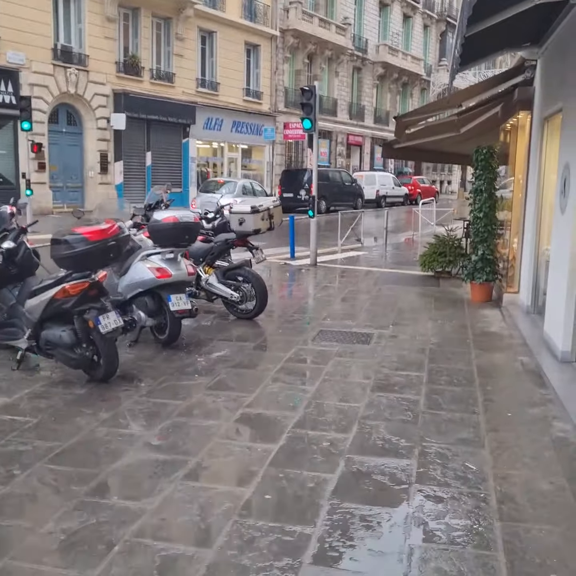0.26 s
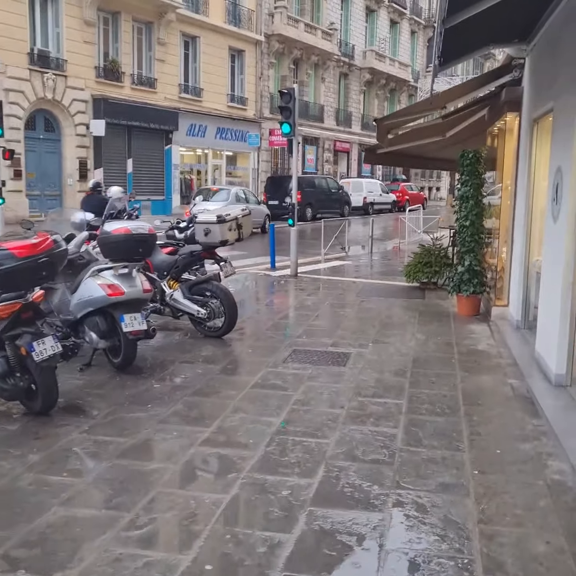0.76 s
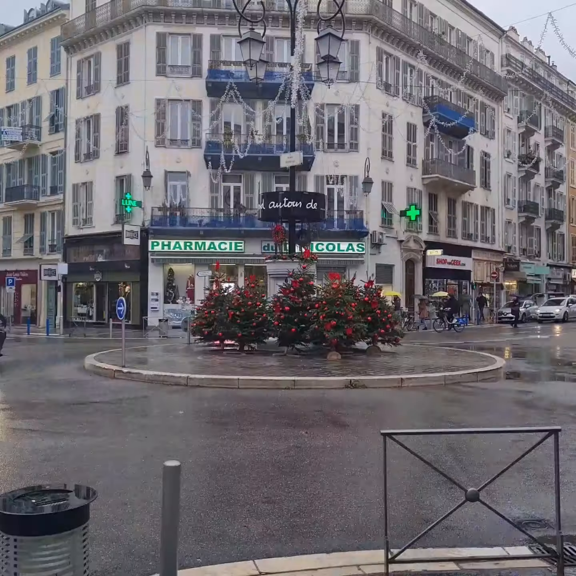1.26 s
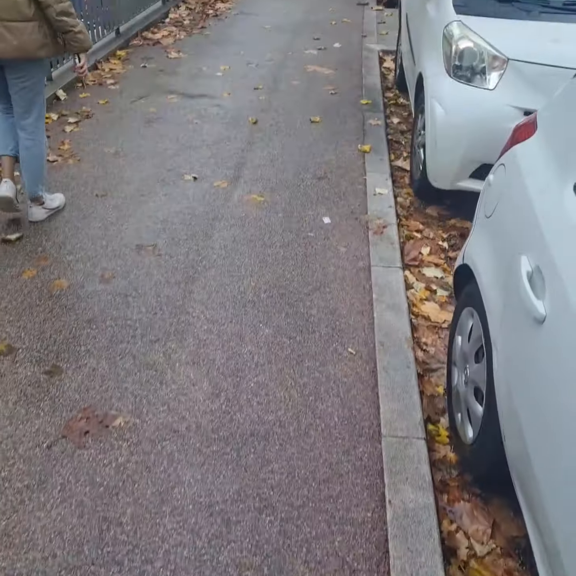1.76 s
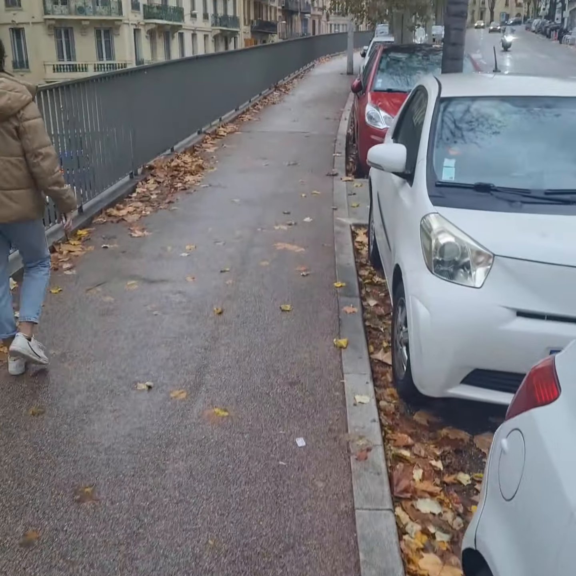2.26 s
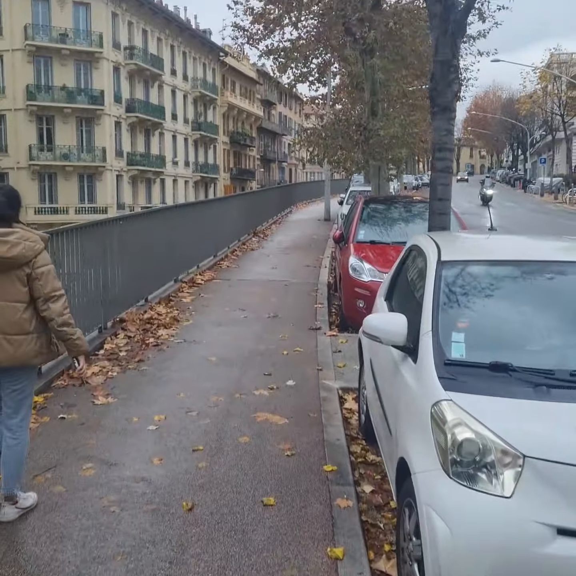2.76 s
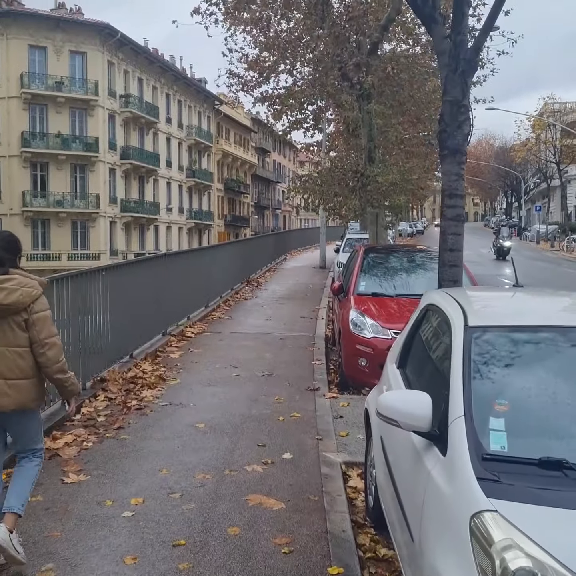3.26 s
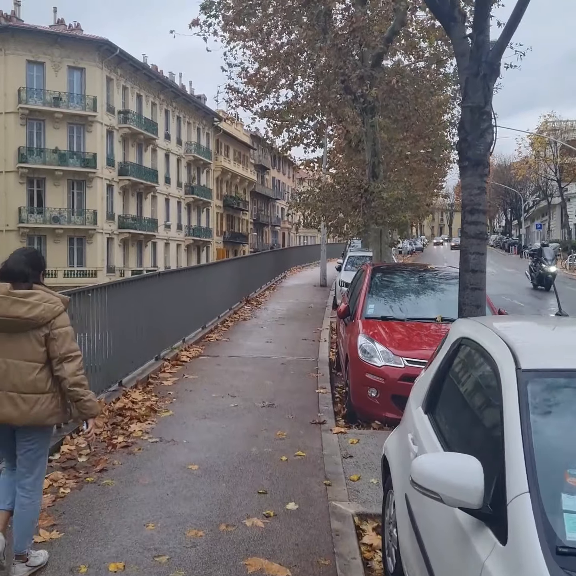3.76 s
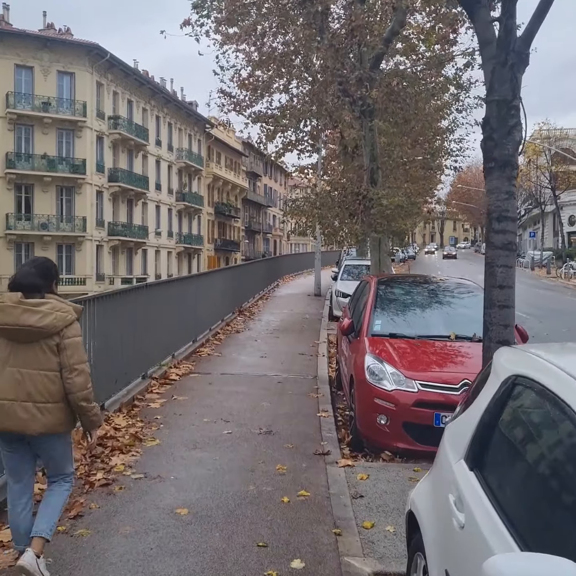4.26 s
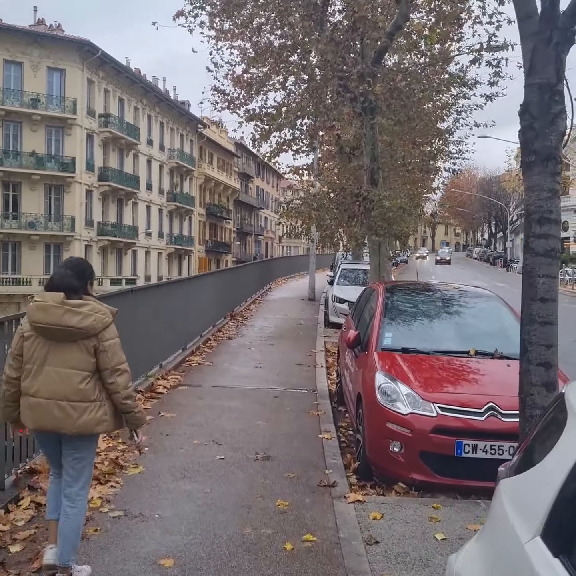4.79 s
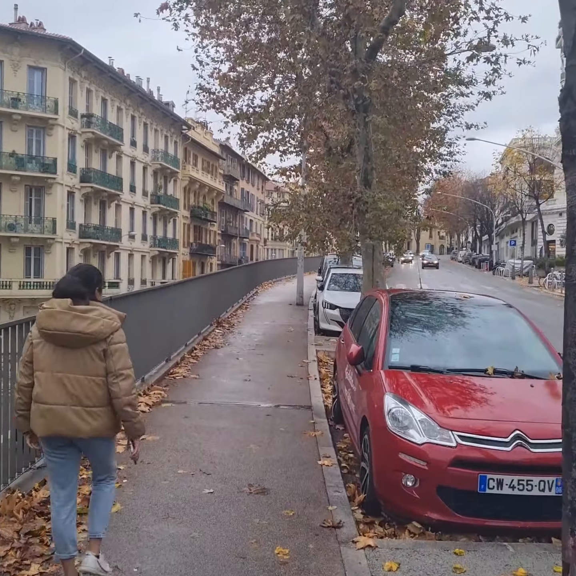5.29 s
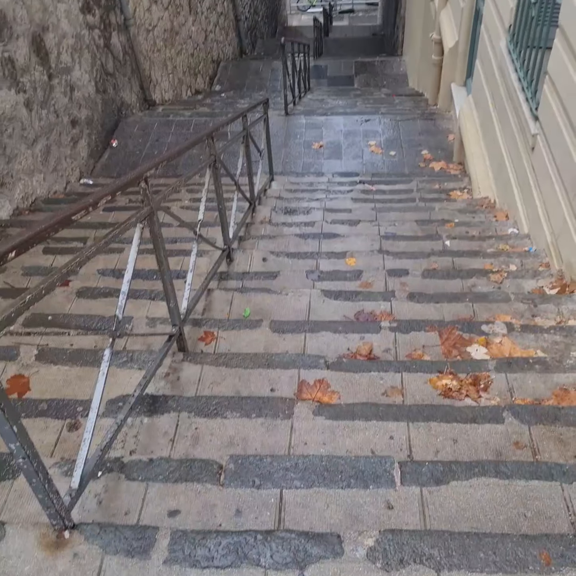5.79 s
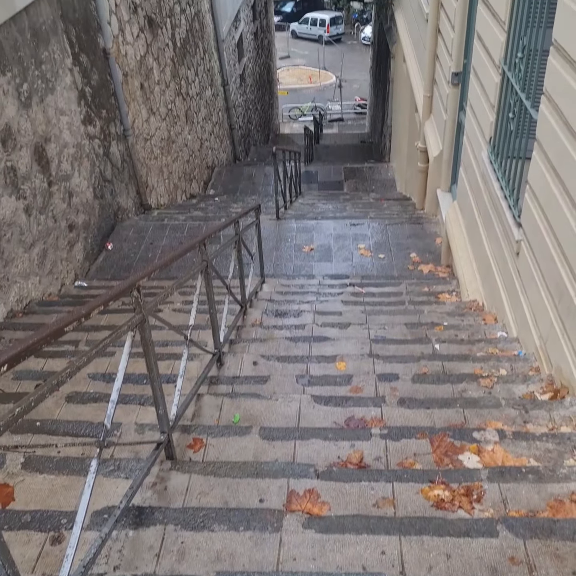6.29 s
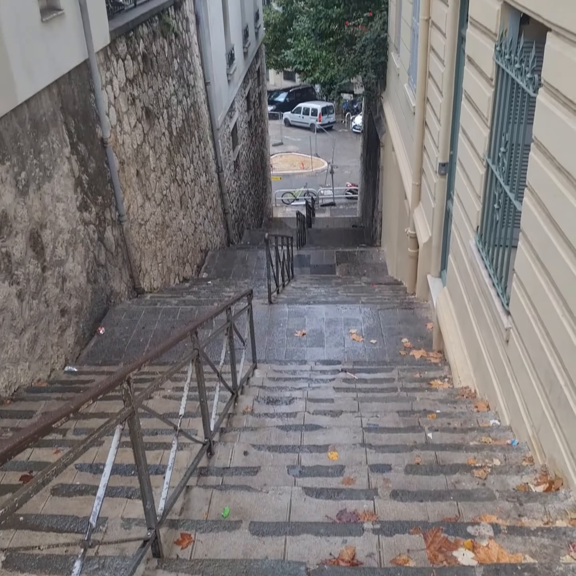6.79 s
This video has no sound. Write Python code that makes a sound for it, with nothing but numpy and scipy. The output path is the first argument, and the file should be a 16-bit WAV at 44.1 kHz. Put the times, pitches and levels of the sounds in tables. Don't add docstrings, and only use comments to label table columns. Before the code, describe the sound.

Wet tyre hiss and faint drops run through three abruptly cut street scenes. First comes a close, steady idling engine whose tones waver in echoes. Next, soft footsteps and passing motors on an avenue, with a high scratchy brake squeal, build to a near car throwing spray. Last, muffled town traffic throbs and hums up a stone stairway. Wide outdoor stereo, near drops ticking by the microphone.

```python
import sys
import numpy as np
from scipy import signal
from scipy.fft import rfft, irfft, next_fast_len
from scipy.io import wavfile
from scipy.ndimage import uniform_filter1d, map_coordinates

SR = 44100
rng = np.random.default_rng(int(sys.argv[2]) if len(sys.argv) > 2 else 0)


def convert_level_to_amplitude(level_db):
    exponent = np.asarray(level_db, float) / 20
    return 10 ** exponent


def generate_wav(sig):
    pcm = np.round(np.clip(np.atleast_2d(sig).T, -1, 1) * 32767).astype(np.int16)
    wavfile.write(sys.argv[1], SR, pcm)


N = 310464

# (start [s], cut [s])
TAKES = [
    (0, 1.4003),
    (1.4967, 5.7097),
    (5.7843, 7.05),
]


def unit(x):
    return x / np.sqrt(np.mean(x ** 2) + 1e-20)


def along(points, hz):
    f, v = np.transpose(points)
    return np.interp(np.log(hz + 1), np.log(f + 1), v)


def curves(rows):
    s, *cols = np.transpose(rows)
    return [np.interp(np.arange(N) / SR, s, c) for c in cols]


def sounding(rows, fade=0.045):
    t = np.arange(N) / SR
    return np.clip(np.minimum(t - rows[0][0], rows[-1][0] - t) / fade + 1, 0, 1)


def wobble(rate):
    knots = rng.standard_normal(int(N * rate / SR) + 4)
    return map_coordinates(knots, [np.arange(N) * rate / SR])


def panned(x, db):
    return np.array([x * convert_level_to_amplitude(db / 2), x * convert_level_to_amplitude(-db / 2)])


def swells(rows, floor_db=-120, rise=1):
    t = np.arange(0, N + 64, 64) / SR
    power = convert_level_to_amplitude(floor_db) ** 2
    for s, db, half in rows:
        width = half * np.where(t < s, rise, 1)
        power = power + convert_level_to_amplitude(db) ** 2 * np.exp(-((t - s) / width) ** 2)
    return np.interp(np.arange(N) / SR, t, np.sqrt(power))


def patchy(count, depth_db):
    z = signal.stft(rng.standard_normal((2, count + 512)), nperseg=512)[2]
    field = uniform_filter1d(rng.standard_normal(z.shape[1:]), size=8, axis=0)
    field = uniform_filter1d(field, size=10, axis=1)
    return signal.istft(z * convert_level_to_amplitude(depth_db * unit(field)), nperseg=512)[1][:, :count]


def tone(hz, rough, rate):
    rough = np.clip(rough, 0, 1)
    carrier = np.exp(2j * np.pi * (np.cumsum(hz) / SR + rng.random()))
    wander = wobble(rate) + 1j * wobble(rate)
    return unit(np.real(carrier * (np.sqrt(1 - rough) + np.sqrt(rough / 2) * wander)))


def hum(rows, rough, rate=14):
    hz, *_ = curves(rows)
    gain = swells([(s, db, half) for s, _, db, half in rows])
    return panned(gain * tone(hz, rough, rate), -1.5 + 1.5 * wobble(3.5))


def squeal(rows, rough, rate, pan_db, flutter_db=2):
    hz, db = curves(rows)
    direct = tone(hz, rough, rate)
    ports = [.75 * direct + .85 * tone(hz, 1, rate) + .4 * tone(hz, 1, 5 * rate) for _ in range(2)]
    gain = convert_level_to_amplitude(db + flutter_db * wobble(70)) * sounding(rows)
    return gain * ports * convert_level_to_amplitude([[pan_db / 2], [-pan_db / 2]])


def street():
    handover_hz = [85, 200, 1000, 3500, 8000, 13000]
    # (frequency [Hz], level [dB])
    road_colours = [
        [(13, -30), (22, 16), (129, -1.5), (204, -4), (266, 9), (352, -0.5), (529, 1.5), (1020, -31),
         (1500, -25), (1950, -45), (3300, -120)],
        [(13, -41), (22, 3), (49, 20), (86, 6), (193, -9.5), (270, -7.5), (413, -12), (948, -16), (1500, -18),
         (1950, -56), (3300, -120)],
        [(13, -43), (22, 6), (81, 6), (112, 2), (151, -10.5), (231, -8.5), (529, -19), (948, -17), (1500, -47),
         (1950, -54), (3300, -120)],
    ]
    # (frequency [Hz], level [dB])
    tyre_colours = [
        [(410, -15), (700, 6.5), (897, 2.5), (995, -2.5), (1340, -4), (2320, -3.5), (3090, -12), (3860, -16),
         (4700, -16.5), (7610, -25), (8900, -30.5), (12700, -21.5), (15800, -24.5)],
        [(410, -34), (700, -1.5), (1630, -1.5), (1990, 0.5), (2580, -6.5), (3350, -9), (3760, -11.5),
         (4880, -11.5), (6590, -18), (7710, -19), (9010, -25), (12000, -15.5), (15800, -16.5)],
        [(410, -31), (700, -0.5), (920, 0), (1260, -1.5), (1380, -0.5), (1910, -1.5), (2180, -6), (3620, -14),
         (4400, -14), (6680, -19), (8670, -29), (12200, -24.5), (15800, -23.5)],
    ]
    # (frequency [Hz], left-right likeness [0 to 1])
    alike = [
        [(60, .75), (130, .85), (290, .6), (640, .4), (1410, .5), (2600, .42), (5500, .11), (15000, .05)],
        [(60, .81), (130, .9), (290, .88), (640, .74), (1410, .4), (2300, .33), (4500, .05), (15000, .03)],
        [(60, .84), (130, .88), (290, .85), (640, .57), (1410, .21), (2600, .04), (6820, .04), (15000, .05)],
    ]
    # (frequency [Hz], left minus right [dB])
    lean = [
        [(60, -3), (200, -4), (700, 0), (1290, -3), (2300, -5.8), (4400, -3.5), (6300, -2), (7600, 6),
         (10000, 5.5), (12000, 0), (15000, -1)],
        [(60, -2.5), (200, -.5), (700, -.5), (1290, -3), (2000, -5.2), (2700, -2.2), (6300, -1), (7600, 6),
         (10000, 4.5), (12000, -1), (15000, -5)],
        [(60, -2), (200, 0), (700, -1), (1290, -4.5), (2000, -4.2), (2700, -2), (6300, -3.8), (7600, 2.5),
         (10000, 4), (12000, 1), (15000, -2)],
    ]
    # (frequency [Hz], phase [rad])
    ahead = [(10, 0), (1700, -.2), (2300, .9), (3200, 2)]
    # (time [s], tread hiss [dB])
    traffic = [
        [(0, -35.5), (.14, -36), (.3, -36), (.75, -38.5), (1.21, -40), (1.39, -36)],
        [(1.51, -46.5), (2.3, -44), (3.3, -41.5), (4.2, -41), (4.6, -39.5), (5.1, -38), (5.5, -36),
         (5.7, -32.5)],
        [(5.8, -41.5), (6.17, -42), (6.4, -40.5), (7.03, -41.5)],
    ]
    usual_db = -40
    # (throb, drone, road roar, tread hiss, water hiss, spray, mist [dB])
    layers_db = [
        (-57.5, -44.5, -38.5, -38.5, -50.5, -69.5, -67),
        (-57, -41.5, -38.5, -39, -48.5, -65.5, -69),
        (-38, -46, -34.5, -39, -45, -60, -68),
    ]
    grows_by = (.3, 0.58, 0.63, 0.82, 1.35, 1.3, 1.2)
    # (time [s], level [dB], half length [s])
    throbs = [(.6, -38.5, 0.26), (1.0, -35, 0.066), (1.36, -37, 0.13), (1.72, -40.5, .1), (2.1, -36, 0.077),
              (2.45, -39, 0.22), (2.9, -46, 0.15), (3.2, -36, 0.14), (3.75, -34, 0.16), (4.22, -37, 0.1),
              (4.4, -38, 0.069), (4.7, -35.5, 0.21), (5.27, -32, 0.12), (5.69, -34, 0.043),
              (5.89, -39, 0.039), (6.1, -42, .07), (6.45, -29, 0.29), (6.9, -37, .1)]
    # (time [s], spray level [dB], half length [s], mist over spray [dB])
    splashes = [(.0, -56.5, 0.053, -1.5), (0.33, -56.5, 0.24, -1), (0.935, -61, .14, -2),
                (1.303, -59.5, 0.24, -14), (1.498, -60.5, 0.014, 1), (1.689, -61, .012, -4),
                (1.8, -63.5, 0.047, 5), (1.918, -62.5, 0.072, 8.5), (2.092, -63, 0.046, 3),
                (2.2, -65, 0.04, 3), (2.29, -64, .015, 6), (2.36, -68, .02, 5), (2.7, -67, 0.027, -1),
                (2.985, -69.5, .05, 3), (3.217, -68, 0.11, 7), (3.652, -68.5, .25, -4),
                (4.068, -69.5, .1, -8), (4.504, -69, 0.1, -5), (4.62, -64, .04, 0), (4.81, -63, .02, 3),
                (4.853, -61.5, 0.099, -2.5), (5.506, -55, 0.24, -13), (5.926, -57.5, 0.25, -5),
                (6.095, -59, 0.045, -1), (6.54, -61, .28, -3), (7.018, -59.5, 0.055, -3)]

    out = np.zeros((2, N))
    spray = swells([(s, db, half) for s, db, half, _ in splashes], rise=0.89)
    mist = swells([(s, db + bright_db, half) for s, db, half, bright_db in splashes], rise=0.89)
    spray = spray * convert_level_to_amplitude(1.6 * wobble(18))
    mist = mist * convert_level_to_amplitude(1.6 * wobble(18))
    none = np.zeros(N)
    splash_body = convert_level_to_amplitude(9) * spray
    extra = [swells(throbs), none, none, none, splash_body, spray, mist]
    for k, (start, end) in enumerate(TAKES):
        a, b = max(round(start * SR) - 400, 0), min(round(end * SR) + 400, N)
        m = next_fast_len(b - a)
        hz = np.fft.rfftfreq(m, 1 / SR)
        turn = np.arccos(np.clip(along(alike[k], hz), -1, 1)) / 2
        mid, side = rfft(patchy(m, depth_db=0.56)) * [np.cos(turn), np.sin(turn)]
        pair = np.array([mid + side, mid - side]) * panned(np.ones_like(hz), along(lean[k], hz))
        pair *= np.exp([.5j * along(ahead, hz), -.5j * along(ahead, hz)])
        pair /= 1 + (37 / (hz + 1)) ** 6
        above = [1 / (1 + (edge / (hz + 1)) ** 8) for edge in handover_hz]
        shares = -np.diff([np.ones_like(hz), *above, np.zeros_like(hz)], axis=0)
        colours = [road_colours[k]] * 3 + [tyre_colours[k]] * 4
        near_db = curves(traffic[k])[0][a:b] - usual_db
        for share, colour, db, grows, more in zip(shares, colours, layers_db[k], grows_by, extra):
            layer = irfft(pair * convert_level_to_amplitude(along(colour, hz)) * np.sqrt(np.abs(share)), m)[:, :b - a]
            gain = np.hypot(convert_level_to_amplitude(db + grows * near_db), more[a:b])
            out[:, a:b] += gain * layer / np.std(layer.mean(axis=0))
    return out


def scooter():
    # (time [s], firing rate [Hz])
    idle = [(0.0, 66.9), (0.406, 67), (0.538, 67.13), (1.01, 66.07), (1.39, 66.43)]
    # (order of the firing rate, level [dB])
    exhaust = [(1, -5), (2, -2), (3, -13), (4, 0), (5, -14.5), (6, -14), (7, -10), (8, -11), (9, -15),
               (10, -21), (11, -19.5), (12, -20), (13, -19), (14, -19.5), (15, -24), (16, -25.5), (17, -29),
               (18, -23)]
    # (time [s], level [dB], half length [s])
    echoes = [
        [(.5, -37, 0.33), (1.05, -37.5, 0.17), (1.32, -30.5, .19)],
        [(.0, -22.5, 0.14), (.4, -27, 0.14), (.76, -29.5, 0.094), (1.1, -31.5, 0.09), (1.32, -39.5, 0.064)],
        [(.12, -29.5, 0.091), (.33, -27.5, 0.11), (.5, -28.5, 0.076), (.66, -26, .11), (.93, -31.5, 0.059),
         (1.17, -31.5, 0.077), (1.28, -38, .05)],
        [(.14, -38.5, 0.13), (1.2, -35, 0.077)],
        [(.55, -37.5, .18), (1.35, -39.5, 0.057)],
        [(.04, -38.5, 0.087), (.4, -42, 0.39), (.87, -39.5, 0.065), (1.06, -37, 0.027)],
        [(.2, -41.5, 0.092), (.82, -35.5, 0.13), (1.2, -44.5, 0.13)],
        [(.22, -41.5, 0.11), (.55, -41, 0.1), (1.05, -41, 0.057)],
    ]
    hz, = curves(idle)
    strong = dict(zip((1, 2, 4, 5, 6, 7, 8, 9), echoes))
    body_db = np.interp(np.arange(N) / SR, [0, .35, 1.4], [-27, -28, -34])
    out = np.zeros((2, N))
    for order, db in exhaust:
        if order in strong:
            gain = swells(strong[order], floor_db=-50)
            out += panned(gain * tone(order * hz, rough=0.05, rate=22), -2.5)
        else:
            gain = convert_level_to_amplitude(body_db + db + 3 * wobble(7))
            out += panned(gain * tone(order * hz, rough=.08, rate=22), -2.5 + 3 * wobble(1.5))
    return out * (np.arange(N) < TAKES[1][0] * SR - 1000)


def drizzle(count=260):
    floor_db, spread_db, t60_s = -63, 11, .004
    when, size, side = rng.random((count, 3)).T
    hits, t = np.zeros((2, N)), np.arange(SR // 100) / SR
    hits[:, (when * N).astype(int)] = panned(convert_level_to_amplitude(floor_db + spread_db * size ** 2), 12 * (side - .5))
    grain = convert_level_to_amplitude(-60 * t / t60_s) * np.diff(rng.standard_normal((2, len(t) + 2)), n=2)
    return signal.fftconvolve(hits, grain, axes=1)[:, :N]


def ticks():
    # (time [s], crack level [dB], ring level [dB], ring frequency
    # [Hz])
    clicks = [(.7154, -44, -36, 4410), (1.3644, -40, -35, 5100), (1.688, -36.5, -52, 10000),
              (2.217, -50, -37.5, 5150), (2.64, -47, -46, 4700), (2.82, -59, -43, 6000),
              (4.1124, -44, -50, 9000), (4.4955, -44, -51, 11000), (3.395, -42, -36, 4900),
              (4.8021, -38, -46, 4540), (5.5269, -44, -32, 4500), (5.568, -38, -45, 9500),
              (6.5461, -39, -48, 10000)]
    out, t = np.zeros((2, N + SR)), np.arange(SR // 10) / SR
    for s, crack_db, ring_db, hz in clicks:
        crack = convert_level_to_amplitude(crack_db - 60 * t / 0.005) * np.diff(rng.standard_normal((2, len(t) + 1)))
        ring = convert_level_to_amplitude(ring_db - 60 * t / 0.029) * np.sin(2 * np.pi * hz * t)
        out[:, round(s * SR):][:, :len(t)] += crack + ring
    return out[:, :N]


def peep():
    # (time [s], frequency [Hz], level [dB])
    squeak = [(0.82, 12300, -65), (0.834, 12200, -68), (0.868, 12500, -54.5), (0.982, 12600, -63),
              (1.1, 12190, -59)]
    return squeal(squeak, rough=0.87, rate=500, pan_db=-6.0)


def avenue_engines():
    # (time [s], frequency [Hz], level [dB], half length [s])
    main = [(1.56, 113.5, -41, 0.047), (1.72, 113.7, -45, .04), (1.97, 111, -37.5, .06),
            (2.05, 108, -38.5, .04), (2.3, 112, -41.5, .07), (2.68, 105, -39, 0.044),
            (2.83, 104.6, -39, .04), (2.97, 106, -35.5, .07), (3.2, 105.9, -35.5, .07),
            (3.45, 104.4, -35, .09), (3.66, 99.9, -40, .03), (3.85, 102.5, -36.5, .06),
            (4.0, 102, -37, 0.041), (4.26, 101.7, -34, .1), (4.72, 98, -33, 0.091), (5.36, 94.2, -26, .11),
            (5.55, 93.4, -27, .08)]
    lower = [(1.6, 71.7, -41, .04), (2.42, 78, -37, .04), (2.84, 78, -38, 0.046), (3.1, 82, -37.5, .07),
             (3.98, 70, -37, .04), (4.4, 71.9, -33.5, .08)]
    upper = [(2.16, 135, -40.5, .04), (2.38, 161.5, -43.5, 0.065), (2.74, 135, -42, .05),
             (3.34, 140, -43.5, 0.051), (3.86, 132, -39, .05), (4.0, 140.8, -37.5, .07),
             (4.27, 148, -39, .08), (4.65, 127, -37, .07), (4.87, 142.8, -34.5, 0.061),
             (5.22, 141.6, -34, 0.11), (5.55, 140.6, -41.5, .12)]
    growl = [
        (5.2, 389.7, -40, 0.17),
        (5.65, 369.5, -38.5, 0.13),
    ]
    return (hum(main, rough=0.1) + hum(lower, rough=0.3) + hum(upper, rough=0.42)
            + hum(growl, rough=1, rate=220))


def steps():
    # (time [s], peak level [dB], frequency [Hz])
    footfalls = [
        (1.81, -34.5, 350),
        (2.5, -33.5, 252),
        (4.32, -32, 290),
    ]
    t = np.arange(N) / SR
    out = np.zeros(N)
    for s, db, hz in footfalls:
        out += convert_level_to_amplitude(db) * np.exp(-((t - s) / 0.014) ** 2) * np.sin(2 * np.pi * hz * t)
    return panned(out, -2.2)


def brakes():
    # (time [s], frequency [Hz], level [dB])
    modes = [
        [(2.85, 6060, -57), (2.94, 6190, -50), (3.1, 6110, -50), (3.18, 6270, -48), (3.36, 6310, -47),
         (3.47, 6300, -53)],
        [(3.39, 6520, -49), (3.45, 6550, -45), (3.58, 6480, -46), (3.7, 6540, -45), (3.79, 6430, -51)],
        [(3.79, 6340, -47), (3.83, 6320, -46), (3.93, 6330, -50), (4.0, 6320, -47), (4.1, 6340, -52)],
        [(4.08, 6100, -57), (4.14, 5900, -55), (4.23, 5960, -58), (4.29, 5940, -62)],
    ]
    grit = [(3.0, 4060, -56), (3.03, 3985, -52), (3.1, 4055, -58), (3.17, 3920, -52), (3.24, 4030, -55)]
    halo = [(3.0, 12300, -69), (3.5, 12600, -66), (4.15, 12200, -68)]
    out = sum(squeal(rows, rough=.6, rate=240, pan_db=-1.2, flutter_db=2.2) for rows in modes[:-1])
    out += squeal(modes[-1], rough=1, rate=520, pan_db=-1.2)
    out += squeal(grit, rough=1.0, rate=620, pan_db=-8.0)
    return out + squeal(halo, rough=.98, rate=900, pan_db=5.0)


def chirps():
    # (time [s], frequency [Hz], level [dB], half length [s])
    slips = [(3.461, 4120, -47, .006), (3.484, 4110, -45, .006), (3.524, 4125, -45, .01),
             (3.54, 4120, -45, .005), (3.57, 4080, -47, .007), (3.601, 4120, -46, .004),
             (3.622, 4120, -47, .007), (3.638, 4130, -48, .005), (3.657, 4105, -44, .005),
             (3.681, 4120, -44, .007), (3.714, 4110, -52, .005), (3.74, 4090, -53, .008),
             (3.785, 4105, -49, .006)]
    hz, *_ = curves(slips)
    gain = swells([(s, db, half) for s, _, db, half in slips], floor_db=-53) * sounding(slips, fade=.01)
    steady_hz = np.full(N, hz.mean()) + .3 * (hz - hz.mean())
    direct = tone(steady_hz, .05, 60)
    ports = np.array([direct + .35 * tone(hz, 1, 90) for _ in range(2)])
    return gain * ports * convert_level_to_amplitude([[-.4], [-1.6]])


def spray_whistle():
    # (time [s], frequency [Hz], level [dB])
    falling = [(5.34, 11950, -60), (5.37, 11800, -58), (5.41, 11650, -58)]
    return squeal(falling, rough=.5, rate=200, pan_db=0.0)


def stair_engines():
    # (time [s], frequency [Hz], level [dB], half length [s])
    main = [(5.87, 96.4, -34.5, .059), (6.1, 95.8, -34, .1), (6.36, 96.5, -27.5, 0.083),
            (6.5, 96.5, -24.5, .1), (6.7, 95.8, -36, .06), (6.97, 94.6, -35, .07)]
    third = [(6.3, 135, -37, .05), (6.52, 135, -36, .06), (6.65, 133, -38, .04), (6.82, 130, -39, .07)]
    upper = [(6.36, 262, -35, 0.032), (6.53, 243, -35, 0.072), (6.68, 225.8, -40, .05),
             (6.83, 238.5, -36, 0.056), (6.96, 247, -36.5, .06)]
    return hum(main, rough=0.06) + hum(third, rough=0.3) + hum(upper, rough=1, rate=90)


def scene():
    weather = drizzle() + ticks()
    engines = scooter() + avenue_engines() + stair_engines()
    squeaks = peep() + brakes() + chirps() + spray_whistle()
    return street() + weather + engines + steps() + squeaks


def roll_off(x):
    return signal.sosfilt(signal.butter(12, 15870, fs=SR, output="sos"), x)


def record(dry):
    t = np.arange(N) / SR
    hiss = convert_level_to_amplitude(-71) * unit(np.diff(rng.standard_normal((2, N + 2)), n=2))
    gate, ringout = np.zeros(N), np.zeros(N)
    ring_hz, ring_db, ring_t60_s = 75, -35, .045
    for start, cut in TAKES:
        gate += np.clip((t - start) / .0012, 0, 1) ** 2 * np.clip((cut - t) / .0004, 0, 1)
        decay = (t > cut) * convert_level_to_amplitude(ring_db - 60 * np.abs(t - cut) / ring_t60_s)
        ringout += decay * np.sin(2 * np.pi * ring_hz * (t - cut))
    lowpass = signal.butter(12, 16300, fs=SR, output="sos")
    heard = signal.sosfiltfilt(lowpass, (dry + hiss) * gate + ringout)
    return roll_off(heard)


dry = scene()
out = record(dry)
generate_wav(out)
```